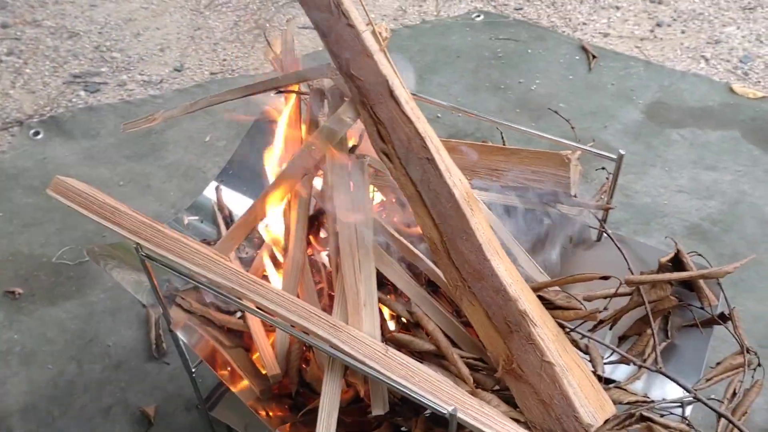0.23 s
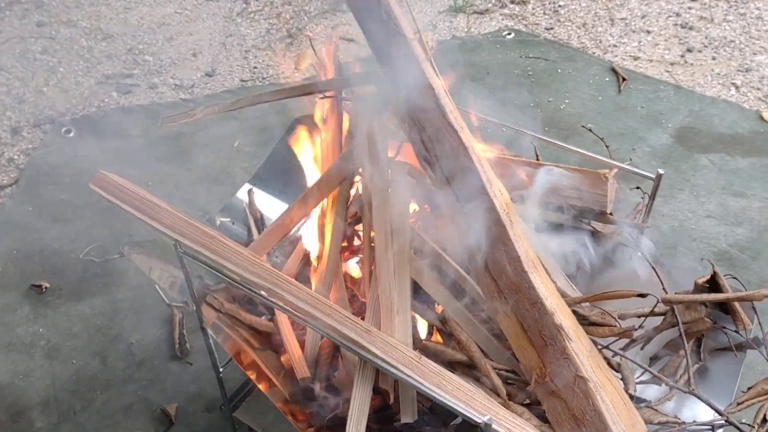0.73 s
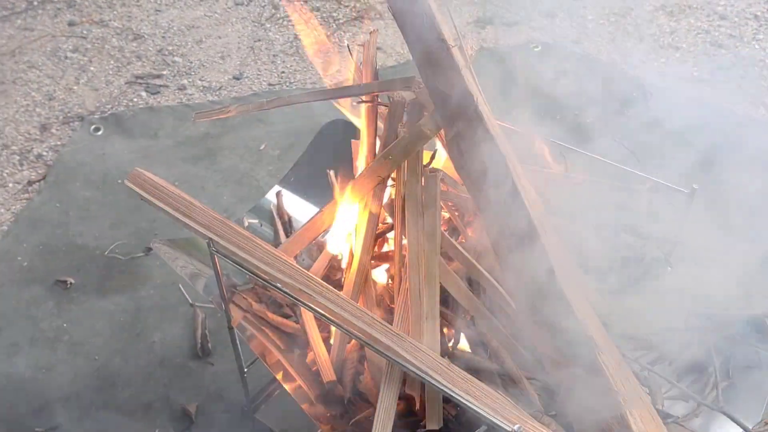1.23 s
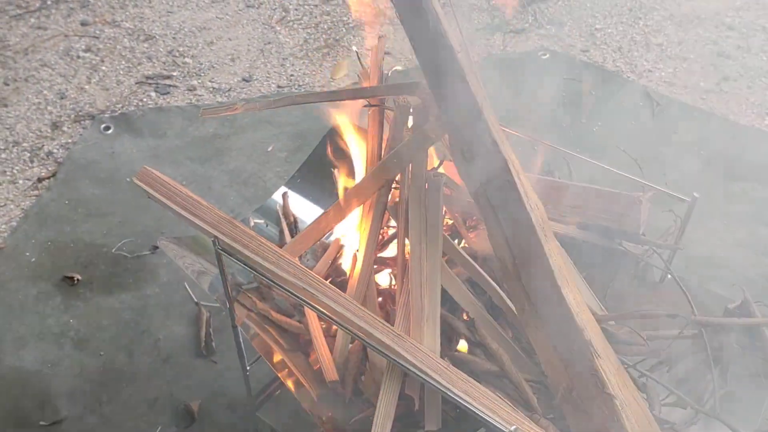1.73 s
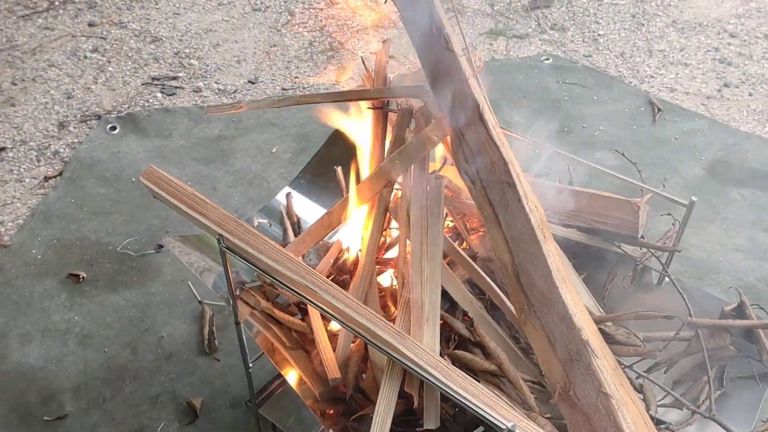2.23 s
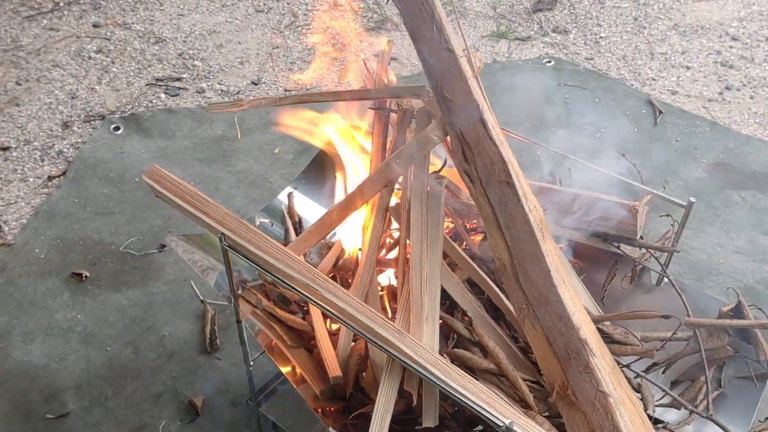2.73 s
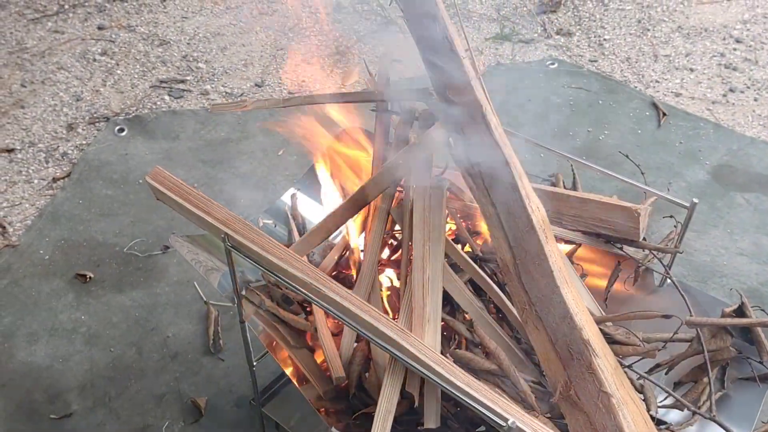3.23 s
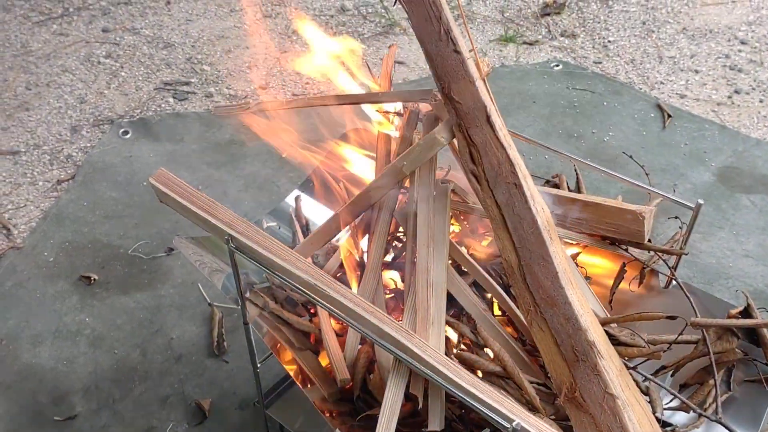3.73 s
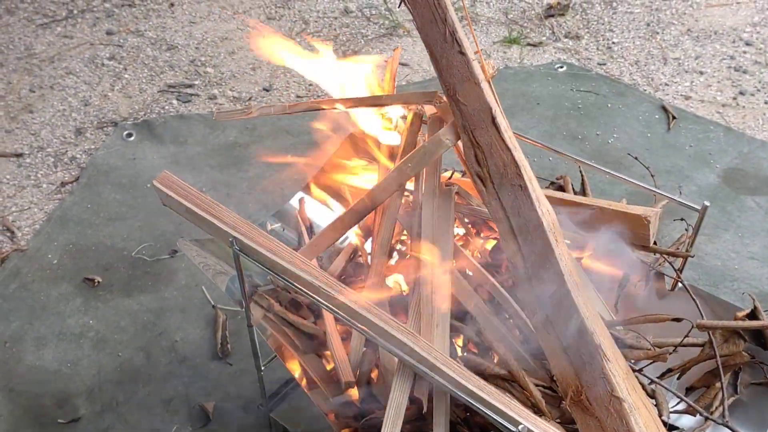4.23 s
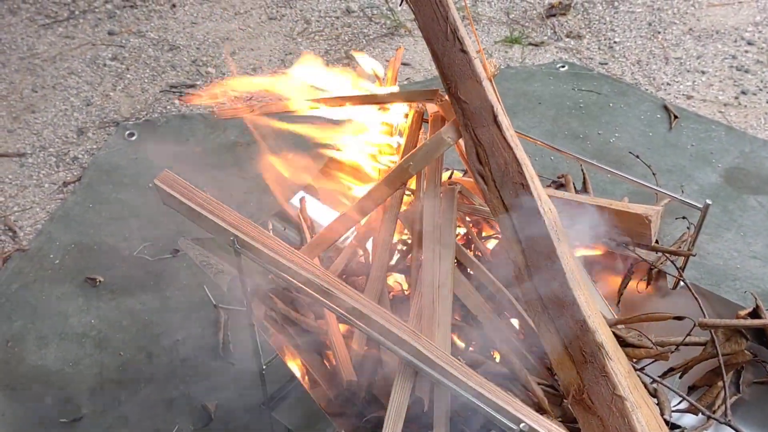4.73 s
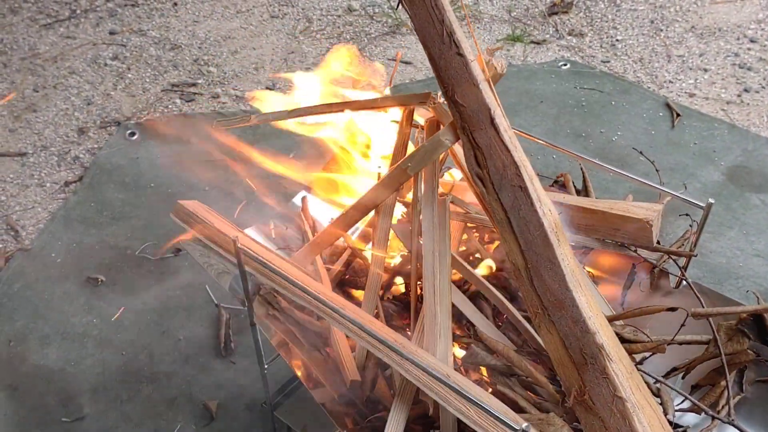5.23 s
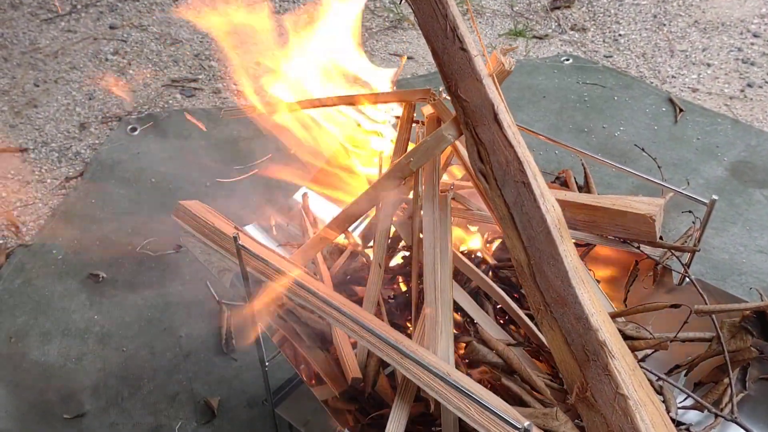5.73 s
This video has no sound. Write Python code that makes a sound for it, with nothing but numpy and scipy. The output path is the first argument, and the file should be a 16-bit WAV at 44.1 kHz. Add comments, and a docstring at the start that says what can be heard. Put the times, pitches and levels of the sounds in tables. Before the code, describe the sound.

Kindling catches fire in open air: dry snaps and pops crowd together, then thin out over hissing steam and faint flame flutter.

```python
"""A small campfire of kindling and split logs in a steel fire pit outdoors, two microphone ports close by.
From the start flames flap, air draws through the stack, sap hisses and tiny ticks grow for 2.8 s.
Sharp cracks begin at 0.1 s and scatter off the surroundings; steam jets, then flares, surge from 0.33 s.
Loud cracks crowd from 0.8 s to 2.4 s; the steady sound dips at 1.94 s, and soft gas puffs start at 2.13 s.
Cracks then thin out, with loud ones up to 5.63 s; the recorder's gain ducks after the loud ones."""
import sys
import numpy as np
from scipy import signal
from scipy.fft import rfft, irfft, next_fast_len
from scipy.io import wavfile
from scipy.ndimage import uniform_filter1d

SR = 44100
rng = np.random.default_rng(int(sys.argv[2]) if len(sys.argv) > 2 else 0)


def dump_mix(stems):
    """Bounce the given channels to the path in sys.argv[1] as a 16-bit WAV at rate SR."""
    frames = np.atleast_2d(stems).T  # one column per channel
    limited = np.clip(frames, -1, 1)  # hard clip at full scale
    pcm = np.round(limited * 32767).astype(np.int16)
    wavfile.write(sys.argv[1], SR, pcm)


N = 263277
TIME = np.arange(N) / SR
TOP_HZ = 16600  # upper edge of the recorded band


def undb(db):
    """Decibels to gain."""
    return 10 ** (np.asarray(db) / 20)


def unit(x):
    """Scale to rms 1."""
    return x / np.sqrt(np.mean(x ** 2))


def add(out, start_s, sound):
    """Mix a sound into the track at a given time."""
    i = max(int(start_s * SR), 0)
    out[:, i:i + sound.shape[-1]] += sound[..., :N - i]


def colour(x, points):
    """Causal minimum-phase filter through (hz, db) points, built from the cepstrum."""
    size = next_fast_len(x.shape[-1] + 1024, True) // 2 * 2
    hz, db = np.transpose(points)
    log_hz = np.log(np.fft.rfftfreq(size, 1 / SR) + 1)
    gain = undb(np.interp(log_hz, np.log(hz), db))
    # folding the cepstrum forward in time makes the filter causal
    cepstrum = irfft(np.log(gain))
    cepstrum[1:size // 2] *= 2
    cepstrum[size // 2 + 1:] = 0
    response = np.exp(rfft(cepstrum))
    return irfft(rfft(x, size) * response)[..., :x.shape[-1]]


def band(x, hz, kind, order=3):
    """Butterworth filter."""
    return signal.sosfilt(signal.butter(order, hz, kind, fs=SR, output="sos"), x)


def walk(rate):
    """Slow chance: random levels held 1 / rate s and slewed twice; spread near 1."""
    hold = int(SR / rate)
    steps = np.repeat(rng.standard_normal(N // hold + 1), hold)
    slewed = uniform_filter1d(uniform_filter1d(steps, hold), hold)
    return np.sqrt(2) * slewed[:N]


def stereo_noise(side_db, shape):
    """Noise at two microphones: a shared part and an opposed part."""
    mid, side = rng.standard_normal((2, *shape))
    opposed = undb(side_db) * side
    return unit(np.stack([mid + opposed, mid - opposed]))


def pan(db):
    """Left and right gains of constant power for a left minus right level."""
    gains = undb(np.stack([db, -db]) / 2)
    return gains / np.sqrt(np.mean(gains ** 2, axis=0))


def per_millisecond(x):
    """Scale each burst so that its first 4 ms hold the energy of 1 ms at rms 1."""
    energy = np.sum(x[..., :int(.004 * SR)] ** 2, axis=-1, keepdims=True)
    return x / np.sqrt(energy / (.001 * SR))


def envelope(start_s, length_s, attack_s, release_s):
    """Rise, hold to the end of the length, then die away."""
    age = TIME - start_s
    return np.clip(age / attack_s, 0, 1) * np.exp(-np.maximum(age - length_s, 0) / release_s)


def surges(rows, attack_s, release_s):
    """Summed power over time of timed rows, one track for each of the two level columns."""
    power = 0
    for start_s, length_s, *levels_db in rows:
        shape = envelope(start_s, length_s, attack_s, release_s)
        power = power + np.outer(undb(levels_db), shape) ** 2
    return power


def over_steady(power, steady_db):
    """Level in dB of a surge on top of a steady sound."""
    return 10 * np.log10(power + undb(steady_db) ** 2)


def lull():
    """Once the hiss, draught and ticks dip briefly: their change in dB before the ticks' share."""
    return -5 * envelope(1.94, length_s=0.26, attack_s=0.029, release_s=0.22)


# Flare-ups that pull air through the stack, levels before trims:
# start_s, length_s, flutter_level_db, draught_level_db
FLARE_UPS = [(.8, 0.38, -86, -70), (1.57, 0.43, -79.5, -65.5), (2.43, 0.088, -93, -59),
             (2.535, 0.067, -79, -56.5), (2.66, 0.081, -80, -68.5), (3.09, 0.34, -73.5, -62.5),
             (4.11, 0.15, -83.5, -68.5), (4.53, 0.042, -78, -59.5), (5.02, 0.38, -88, -63.5),
             (5.56, 0.17, -82, -64)]


def flare_levels():
    """Quiet burning plus flare-ups: flutter and draught levels in dB before trims."""
    flutter, draught = surges(FLARE_UPS, attack_s=0.02, release_s=0.034)
    return over_steady(flutter, -82.5), over_steady(draught, -69)


# Spectrum of the flapping flames: pitch_hz, level_db
FLAME_SPECTRUM = [(20, -19), (45, -10), (80, -4), (150, 3.5), (260, -2.5), (400, -2.5), (900, -11.5),
                  (2000, -23.5)]
# Spectrum of air drawn through the hollow stack: pitch_hz, level_db
DRAUGHT_SPECTRUM = [(200, -29.5), (380, -13.5), (560, -2), (730, 3.5), (920, -6), (1130, -4.5),
                    (1500, -19.5), (2600, -40)]


def flames(flutter_db, draught_db, draught_trim_db=-1, flap_db=-0.3, gust_db=3.0):
    """Turbulent flames flap softly and draw air through the hollow of the stack."""
    flapping = colour(stereo_noise(-15, (N,)), FLAME_SPECTRUM) * undb(flap_db * walk(50))
    gusting = colour(stereo_noise(-6.5, (N,)), DRAUGHT_SPECTRUM) * undb(gust_db * walk(90))
    flutter = unit(flapping) * undb(flutter_db)
    draught = unit(gusting) * undb(draught_db + draught_trim_db)
    return flutter + draught


HISS_DB = -57.5  # steady hiss before its trim
# Spectrum of escaping steam: pitch_hz, level_db
STEAM_SPECTRUM = [(700, -18), (1300, -0.5), (1900, 5), (3000, -0.5), (4200, 4), (6300, 2), (7700, 3),
                  (9200, 2), (10100, -3.5), (11500, -5), (13000, -3.5), (15600, 1.5), (16300, -37)]


def sap_hiss(db, trim_db=-0.72, flicker_db=2.25, jet_db=-0.03, side_db=-0.5):
    """Steam leaves the end grain in several jets, each wavering by itself."""
    steam = unit(colour(stereo_noise(side_db, (N,)), STEAM_SPECTRUM))
    spectrum, hz = rfft(steam), np.fft.rfftfreq(N, 1 / SR)
    jets_hz = [1800, 4400, 8200, 14500]
    out = 0
    for share in np.eye(len(jets_hz)):
        # overlapping shares of the spectrum add up to the whole
        jet = irfft(spectrum * np.interp(hz, jets_hz, share), N)
        out = out + jet * undb(jet_db * walk(14) + flicker_db * walk(160))
    return out * undb(db + trim_db)


# Modes of the stacked sticks, before each blow alters them: pitch_hz, level_db, t60_s
STICK_MODES = [(731, -2, 0.035), (1179, -3, 0.035), (1778, -4, 0.03), (1992, 1, 0.021), (2510, -6.5, 0.022)]
# Spectrum of the tiny ticks: pitch_hz, level_db
TICK_SPECTRUM = [(1000, -6), (2000, -2), (3100, -6), (4300, -1), (6200, -0.5), (8500, 3.5), (10300, -1.5),
                 (14500, 3.5), (16500, -18)]


def crackle(hiss_db, rate=75, level_db=-55, follow=0.67, spread_db=4, most_db=10, decay_s=0.00044,
            pan_db=5, lean_db=-2, wood_db=-9, wood_spread_db=4, count=1500, size=300):
    """Tiny bursts in bark and embers, a few larger than the rest, stronger while the sap boils."""
    t, out = np.arange(size) / SR, np.zeros((2, N))
    draws = rng.random((count, 3))
    noise = rng.standard_normal((count, 2, size))
    grains = per_millisecond(noise * np.exp(-t / decay_s))
    sides = pan(lean_db + pan_db * rng.standard_normal(count)).T
    keep_chance = rate * N / SR / count  # rate is in ticks per second
    for (when, keep, luck), grain, side in zip(draws, grains, sides):
        if keep < keep_chance:
            start_s = when * N / SR
            boil_db = follow * (hiss_db[int(when * N)] - HISS_DB)
            extra_db = min(-spread_db * np.log(luck), most_db)
            # as the fire catches, the ticks grow from -4 dB to full strength in 2.8 s
            young_db = -4 * max(1 - start_s / 2.8, 0)
            add(out, start_s, undb(level_db + boil_db + extra_db + young_db) * grain * side[:, None])
    # each tick also taps the wood, some much harder than others
    t = TIME[:4 * size]
    tap = 0
    for hz, db, t60 in STICK_MODES:
        # taps ring half as long as the listed t60
        tap = tap + undb(db - 60 * t / (t60 / 2)) * np.sin(2 * np.pi * hz * t)
    blows = out.mean(0) * undb(wood_spread_db * walk(70))
    taps = signal.fftconvolve(blows, tap / np.linalg.norm(tap))[:N]
    return band(colour(out, TICK_SPECTRUM) + undb(wood_db) * taps, 545, "highpass")


# Steam pockets that burst the wood; levels set the bursts before tilt, trims and the recorder's gain:
# start_s, level_db (over one millisecond), brightness_db, woodiness_db (knock over burst),
# hollowness_db (low ring over knock), left_minus_right_db
STEAM_POCKETS = [(0.104, -45.5, 0, 8.5, -15, -10), (0.3751, -45, 0, -10, -3, -8),
                 (0.4033, -43.5, -5.5, -22, 1, -8), (0.688, -38.5, -3, -21, -6, -9),
                 (0.8106, -45, -5, -1, -17, -4), (0.8326, -32, -5.5, -5, 1.5, -1.5),
                 (0.8538, -33.5, 2, -19, -13, -8), (0.8608, -27.5, -1, -17.5, -12, -2.5),
                 (0.9097, -22, 2.5, -15.5, -13, 3), (0.9148, -25, -0.5, -16.5, -3, 14),
                 (1.1608, -18.5, -1.5, -17, -3, 10.5), (1.286, -40, -1.5, -11.5, -1, 8),
                 (1.3279, -23.5, 1, -13, -4.5, 1), (1.3597, -26, 0.5, -17.5, -10, -1),
                 (1.3628, -28.5, -2, -10.5, -14, 6), (1.4008, -29, -3.5, -7, -16, 1),
                 (1.5706, -34, -2, -8.5, -1, -1), (1.5891, -41.5, -7.5, -4, 1, -7),
                 (1.5982, -27.5, 0.5, -10, -13, -2.5), (1.6225, -33, 0.5, -13, -4, -3.5),
                 (1.6916, -39.5, -2, -7, -3, -4), (1.7328, -24, -1, -22, 1, 1),
                 (1.7442, -22, 2.5, -17, -9, 6.5), (1.8531, -29.5, -3.5, -15, -0.5, 6),
                 (1.8709, -26.5, 0, -25, 0, 3), (1.942, -35.5, 2, -10.5, -15, -2),
                 (1.946, -23, 1, -21.5, -4, 1.5), (2.0302, -61, 8, 18.5, -6, 1),
                 (2.128, -25.5, 2.5, -14.5, 1, 13), (2.148, -17, -1, -11.5, -5.5, 4),
                 (2.2173, -26, 3, -11, -12, 5), (2.3458, -37, 1, -20, 3, 2),
                 (2.363, -31.5, 4.5, -10.5, -12, 0.5), (2.4006, -42.5, 1, -18, -16, -3),
                 (2.4771, -43.5, -1.5, -22, 5, 0), (2.5753, -39, -2, -28, 1, -2),
                 (2.6062, -37, 3, -6.5, -9, 1), (2.8167, -41, -0.5, -21, -13, -11),
                 (2.909, -41, -2.5, -18, -6, -3), (2.9947, -40, -0.5, -21, -12, -3),
                 (3.1164, -32, -3.5, 0, -3, -2), (3.1582, -37.5, 4.5, -8.5, -22, -7),
                 (3.1934, -41.5, 3, -10.5, 3, -4), (3.28, -37, 0.5, -21, 7, -5),
                 (3.5402, -40, -9.5, -19, -7, -3), (3.6182, -23, 0, -15.5, -16, -0.5),
                 (3.712, -37.5, 0.5, -16.5, 0, 7), (3.7665, -46.5, 2.5, -32, -3, 3),
                 (3.9215, -44, 2, -1, -15, -3), (4.1272, -45, -1, 3, -18, -6),
                 (4.1939, -43, -0.5, -4.5, -5, -8), (4.2962, -38.5, -2, -16, -3, -5),
                 (4.322, -37.5, -1.5, -20, -8, -3), (4.3688, -37, 2.5, -12, -16, -14),
                 (4.4221, -18.5, 2, -10.5, -11, 13), (4.43, -27.5, 1, -17.5, -12, 17),
                 (4.4434, -29.5, -1, -19, -12, 20), (4.5343, -44, 0, 0, -8, 7),
                 (4.5521, -25.5, -1.5, -18.5, -7, 1), (4.5698, -43, 4, -6, 6, 4),
                 (4.676, -36, -1.5, -22, 7, -3), (4.7488, -40, -1, -14, -15, -3),
                 (4.9527, -45.5, 2, -18, -2, -1), (4.9715, -36.5, -4, -13.5, 1, -6),
                 (5.066, -28, -3, -20, -8, -5), (5.0867, -21, -1.5, -7.5, -10, -4.5),
                 (5.1317, -34.5, 0, -20, -4, 1), (5.2753, -17.5, 0, -22.5, -6, 2),
                 (5.4068, -41, -2, -5.5, 0, 0), (5.451, -44, -6, -51, 6, -18),
                 (5.516, -38.5, -3, 3.5, -1, -5.5), (5.586, -46, 3, 2.5, 1.5, -4),
                 (5.6283, -20, -4, -16.5, -0.5, -6), (5.8173, -40, 1, -21, 7, -9)]
# Spectrum of a tearing crack: pitch_hz, level_db
CRACK_SPECTRUM = [(1000, -3), (2200, -2.5), (3100, -7), (4300, 1), (6200, -4), (7600, 7.5), (9100, 10),
                  (10000, -8.5), (11500, -7), (13000, -2), (15400, -0.5), (16500, -26)]
WOOD_SPLIT_HZ, SNAP_HZ, SPIT_HZ, FIZZ_HZ = 1400, 2700, 6500, 10000  # band edges


def cracks(tear_s=.00055, rattle_s=.0022, rattle_db=-11, ring_doubling_db=13, wood_pan=0.88,
           dry_knock_db=-1, hollow_db=-1, burst_db=-1, dulling=.24, size=2600):
    """Fibres tear in under a millisecond; the burst rattles between the sticks and rings their modes."""
    start, level, brightness, woodiness, hollowness, side = np.transpose(STEAM_POCKETS)
    # the deeper in the wood a burst sits, the more it knocks and the duller it is
    tilt = brightness - dulling * woodiness
    snap, spit, fizz = level - 1.5 - tilt, level + 0.5, level - 4.5 + tilt
    knock = level + woodiness
    hollow = knock + hollowness

    t = np.arange(size) / SR
    chance = rng.standard_normal((3, len(start), size))
    tear = t / tear_s * np.exp((1 - (t / tear_s) ** 2) / 2)
    rattle = undb(rattle_db) * np.exp(-t / rattle_s) * np.minimum(t / tear_s, 1)
    burst = colour(chance[:2] * (tear + rattle), CRACK_SPECTRUM)
    sharp = 0
    for lo, hi, db in [(SNAP_HZ, SPIT_HZ, snap), (SPIT_HZ, FIZZ_HZ, spit), (FIZZ_HZ, TOP_HZ, fizz)]:
        part = per_millisecond(band(burst, [lo, hi], "bandpass"))
        sharp = sharp + part * undb(db + burst_db)[:, None]

    # a dull burst sits deep in the wood and lets it ring longer, up to the listed t60
    hold = 2 ** (np.minimum(hollow - spit, 0) / ring_doubling_db)[:, None]
    low, high = 0, 0
    for k, (hz, db, t60) in enumerate(STICK_MODES):
        # every burst strikes another stick at another place
        detune = .035 * chance[2, :, 2 * k, None]
        strength_db = 2.5 * chance[2, :, 2 * k + 1, None]
        decay = undb(db + strength_db - 60 * t / (t60 * hold))
        mode = (-1) ** k * decay * np.sin(2 * np.pi * hz * (1 + detune) * t)
        if hz < WOOD_SPLIT_HZ:
            low = low + mode
        else:
            high = high + mode

    # the ring comes with the dull, toneless part of the burst itself
    wood = 0
    for modes, edges, db in [(low, [WOOD_SPLIT_HZ / 2, WOOD_SPLIT_HZ], hollow + hollow_db),
                             (high, [WOOD_SPLIT_HZ, SNAP_HZ], knock)]:
        dull = per_millisecond(band(burst.mean(0), edges, "bandpass"))
        blow = per_millisecond(per_millisecond(modes) + undb(dry_knock_db) * dull)
        wood = wood + blow * undb(db)[:, None]
    wood = band(wood, 505, "highpass")  # thin sticks radiate little bass

    sounds = sharp * pan(side)[..., None] + wood * pan(wood_pan * side)[..., None]
    out = np.zeros((2, N))
    for k, s in enumerate(start):
        add(out, s - tear_s / 2, sounds[:, k])
    return out


def surroundings(x, near_db=-14.5, near_t60=0.015, far_db=-17.0, far_t60=0.11,
                 echo_s=0.0216, echo_db=-21, echo_spread_s=0.0029, size=11000):
    """Open air: quick scatter from pit and ground, one blurred echo, and a thin tail."""
    t = np.arange(size) / SR
    near = np.exp(-np.log(1000) * t / near_t60) * (t > .003)
    far = np.exp(-np.log(1000) * t / far_t60) * (t > .008)
    echo = np.exp(-np.abs(t - echo_s) / echo_spread_s)
    response = 0
    for db, shape in [(near_db, near), (far_db, far), (echo_db, echo)]:
        response = response + undb(db) * rng.standard_normal((2, size)) * shape / np.linalg.norm(shape)
    return band(signal.fftconvolve(x, response, axes=1)[:, :N], 390, "highpass", order=1)


# Jets of steam from boiling sap, levels before trims: start_s, length_s, hiss_level_db, rush_level_db
STEAM_JETS = [(.33, .25, -66, -62), (.78, 0.2, -61, -60), (1.57, 0.23, -60.5, -70),
              (2.57, 0.14, -61.5, -76), (3.08, 0.34, -59, -65), (3.5, 0.92, -69, -67),
              (4.97, 0.21, -53.5, -66), (5.04, 0.052, -43, -55), (5.18, 0.2, -52, -68),
              (5.52, 0.19, -55, -68)]


def jet_powers():
    """Boiling sap drives out steam: power over time of the hiss and of the lower rush."""
    return surges(STEAM_JETS, attack_s=0.034, release_s=0.042)


def steam_rush(power, trim_db=-2, sputter_db=2.0, side_db=-4):
    """A strong jet sputters with a lower rush under its hiss."""
    rush = band(stereo_noise(side_db, (N,)), [1020, 2300], "bandpass", order=2)
    return unit(rush * undb(sputter_db * walk(70))) * np.sqrt(power) * undb(trim_db)


# Soft puffs of gas that ignite, levels before panning: start_s, level_db, pitch_hz, t60_s
GAS_PUFFS = [(2.129, -38.5, 290, 0.0039), (5.2758, -41, 273, 0.0041), (5.517, -58, 165, 0.043)]


def puffs(side_db=4, size=4000):
    """A pocket of gas flares: one damped low pulse."""
    out, t = np.zeros((2, N)), np.arange(size) / SR
    for start_s, db, hz, t60 in GAS_PUFFS:
        decay = np.exp(-np.log(1000) * t / t60)
        add(out, start_s, undb(db) * decay * np.sin(2 * np.pi * hz * t))
    return out * pan(side_db)[:, None]


def scene():
    """Cracks and crackle with their echoes, over hiss and flames that surge with each jet and flare."""
    flutter_db, draught_db = flare_levels()
    hiss, rush = jet_powers()
    lull_db = lull()
    hiss_db = over_steady(hiss, HISS_DB) + lull_db
    burning = flames(flutter_db, draught_db + lull_db)
    bursts = crackle(hiss_db) + cracks()
    return burning + sap_hiss(hiss_db) + bursts + surroundings(bursts) + steam_rush(rush) + puffs()


# Treble and bass balance of the two microphone ports: pitch_hz, left_minus_right_db
PORT_BALANCE = [(150, -0.5), (380, 4.5), (1300, -1.5), (4400, 0), (8300, 5.5), (10500, 2.5), (14000, -6)]


def record(dry, threshold_db=-26, slope=0.22, recovery_db_per_s=18, attack_s=0.024):
    """Each port has its own colour; gain control too slow for the cracks ducks what follows; the top is cut."""
    ports = []
    for x, sign in zip(dry, (1, -1)):
        ports.append(colour(x, [(hz, sign * db / 2) for hz, db in PORT_BALANCE]))
    sound = band(np.stack(ports), 35, "highpass", order=2)  # small ports lose the deepest bass
    peak_db = 20 * np.log10(np.abs(sound).max(0) + 1e-9)
    over = slope * np.maximum(peak_db - threshold_db, 0)
    # the wanted cut jumps up at once and recovers at a steady rate
    recovery = recovery_db_per_s * TIME
    held = np.maximum.accumulate(over + recovery) - recovery
    pole = np.exp(-1 / (attack_s * SR))
    cut_db = signal.lfilter([1 - pole], [1, -pole], held)
    top_cut = signal.ellip(10, .2, 70, TOP_HZ, fs=SR, output="sos")
    return signal.sosfilt(top_cut, sound * undb(-cut_db))


dry = scene()
out = record(dry)
dump_mix(out)
```